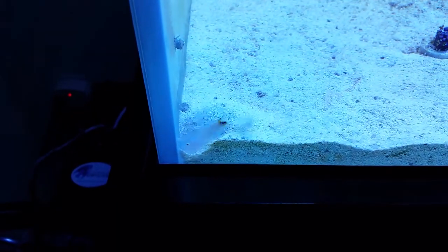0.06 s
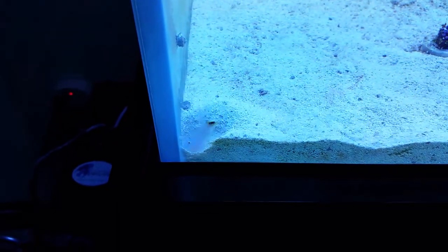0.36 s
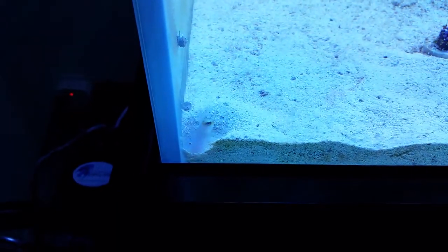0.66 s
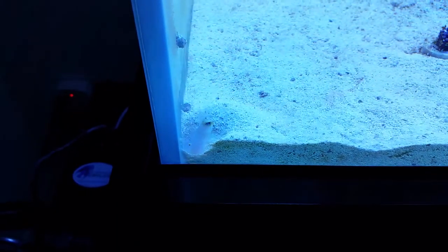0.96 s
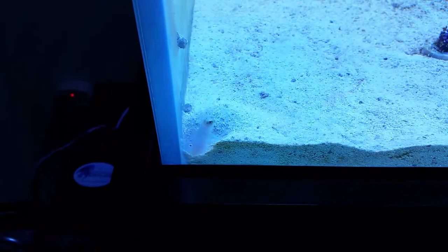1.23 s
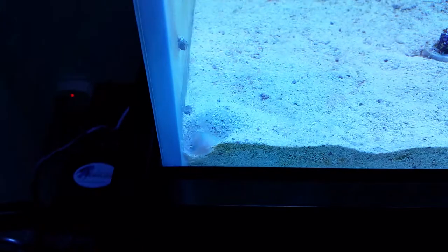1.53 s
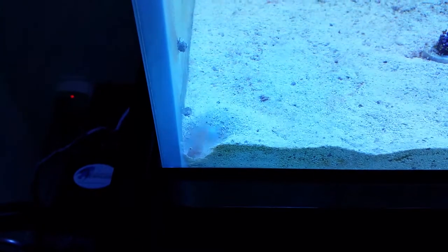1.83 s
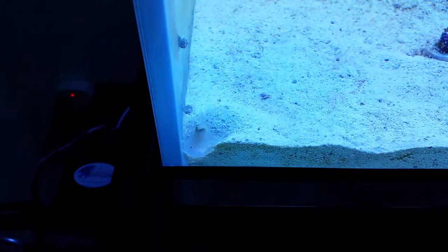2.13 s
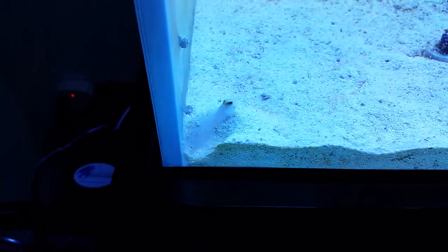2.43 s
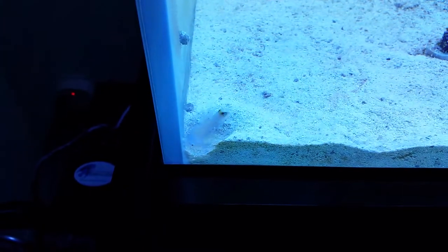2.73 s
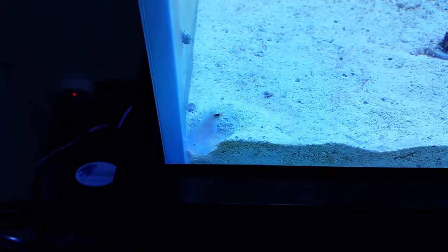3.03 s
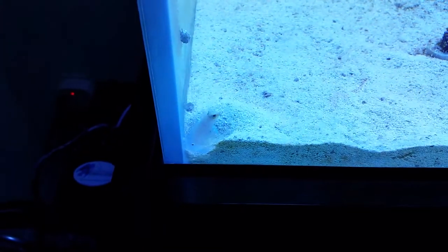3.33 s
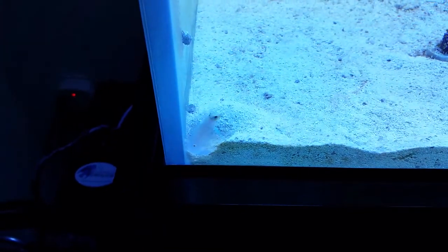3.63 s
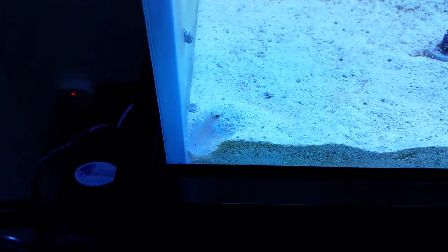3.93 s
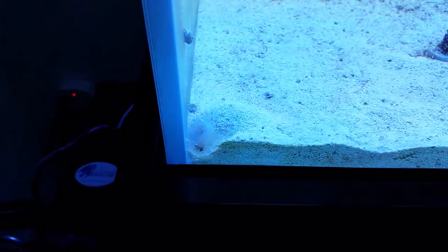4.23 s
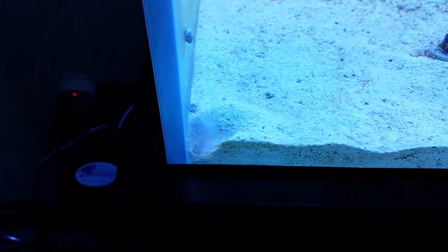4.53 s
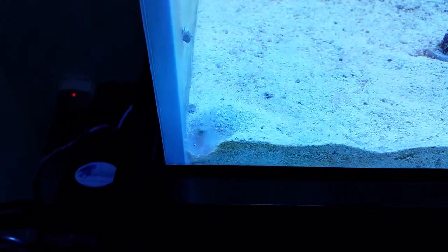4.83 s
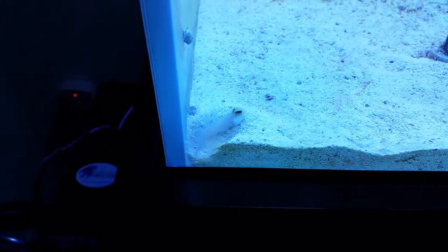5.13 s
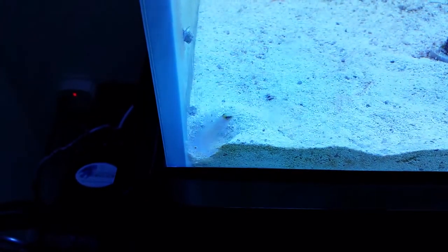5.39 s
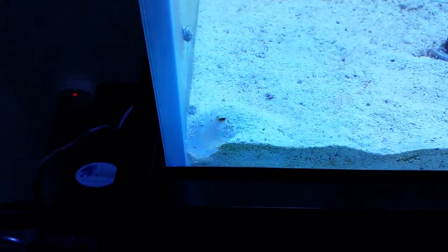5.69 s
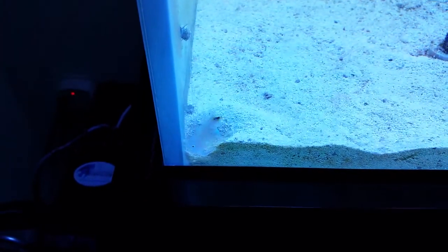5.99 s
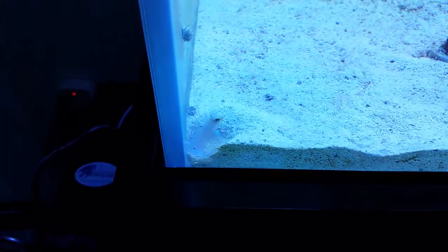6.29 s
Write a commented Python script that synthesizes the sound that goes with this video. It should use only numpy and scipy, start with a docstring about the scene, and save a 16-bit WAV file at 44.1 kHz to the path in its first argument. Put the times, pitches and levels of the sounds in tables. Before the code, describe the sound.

Water trickles and bubbles through a fish tank's circulation, with small splashes over the steady low hum of a pump.

```python
"""From the start, an aquarium pump hums through its stand in a quiet room and a second motor drones beside it.
All the while, turbulent water rushes down the drain, exciting its hollow resonances, and trickles into
a reservoir in the cabinet: drops splash on impact and trapped bubbles plink as they oscillate.
At 3.3 s something bumps softly, and the water runs on to the end."""
import sys
import numpy as np
from scipy import signal
from scipy.fft import rfft, irfft
from scipy.io import wavfile

SR = 44100
rng = np.random.default_rng(int(sys.argv[2]) if len(sys.argv) > 2 else 0)


def dump(signal):
    """Clip the signal to [-1, 1] and save it as 16-bit WAV at the path in sys.argv[1]."""
    limited = np.clip(np.atleast_2d(signal).T, -1, 1)
    pcm = np.round(limited * 32767).astype(np.int16)
    wavfile.write(sys.argv[1], SR, pcm)


N = 280035


def from_db(db):
    return 10 ** (np.asarray(db) / 20)


def unit_rms(x):
    return x / np.sqrt(np.mean(x ** 2) + 1e-20)


def at_hz(points, hz):
    """Interpolation on a logarithmic frequency axis."""
    frequencies, values = np.transpose(points)
    return np.interp(np.log(hz + 1e-9), np.log(frequencies), values)


def pan(balance_db):
    """Interchannel level difference: left and right gains."""
    return from_db(np.array([[1], [-1]]) * balance_db / 2)


def drift(corner_hz):
    """Slow random fluctuation: low-passed noise of unit rms."""
    hz = np.arange(N // 2 + 1) * SR / N
    return unit_rms(irfft(rfft(rng.standard_normal(N)) / (1 + (hz / corner_hz) ** 2), N))


def add(track, s, sound):
    """Superposition: a sound joins the track at time s."""
    start = max(int(s * SR), 0)
    part = sound[..., :max(N - start, 0)]
    track[..., start:start + part.shape[-1]] += part


def resonate(x, hz, width_hz, stages=1):
    """Two-pole resonators in series, each with unit peak gain."""
    r = np.exp(-np.pi * width_hz / SR)
    feedback = [1, -2 * r * np.cos(2 * np.pi * hz / SR), r * r]
    for _ in range(stages):
        x = signal.lfilter(np.array([1, 0, -1]) * (1 - r * r) / 2, feedback, x)
    return x


# Harmonics of the pump: (multiple of the mains frequency, rms level [dB], left minus right [dB])
PUMP_HARMONICS = [(1, -51.6, 1), (2, -44.6, 4), (3, -27.9, -0.6), (4, -52.3, 9), (5, -43.3, 2),
                  (6, -55.2, 2), (7, -52.4, 3), (8, -53.1, 7), (9, -54.2, 7), (10, -63.1, 9),
                  (12, -64.9, 9), (14, -62.2, 3), (15, -61.5, 4), (17, -66.2, 4)]
def pump(mains_hz=60.0, strong_waver_db=0.5, faint_waver_db=1.25, right_lag_s=0.00025):
    """Forced vibration at harmonics of the mains; the faint partials waver more than the strongest."""
    t = np.arange(N) / SR - np.array([[0], [right_lag_s]])
    strongest_db = max(db for _, db, _ in PUMP_HARMONICS)
    out = np.zeros((2, N))
    for order, db, balance_db in PUMP_HARMONICS:
        waver = (strong_waver_db if db == strongest_db else faint_waver_db) * drift(1.6)
        partial = np.sin(2 * np.pi * (mains_hz * order * t + rng.random()))
        out += from_db(db + waver) * pan(balance_db) * partial
    return np.sqrt(2) * out


def motor(mean_hz=145.5, wander_hz=0.51, level_db=-47.5):
    """Frequency modulation: the second motor's tone follows its slightly unsteady speed."""
    hz = mean_hz + wander_hz * drift(0.89)
    return from_db(level_db) * unit_rms(np.sin(2 * np.pi * np.cumsum(hz) / SR))


def bump(s=3.311, hz=82, db=-25, length_s=0.019):
    """A low tone burst of under two cycles is heard as a soft, dull knock."""
    out, t = np.zeros(N), np.arange(int(length_s * SR)) / SR
    add(out, s, from_db(db) * np.hanning(len(t)) * np.sin(2 * np.pi * hz * t))
    return out


# Direction of the water's sound: (frequency [Hz], left minus right [dB])
WATER_BALANCE = [(60, 10.5), (140, -6.5), (300, 0.5), (560, 3.5), (800, 2.5), (2000, 4.5), (3200, 6),
                 (4100, -1), (5400, -0.5), (7000, 4), (8300, 7), (10300, -4), (13000, -0.5)]
# Likeness of left and right: (frequency [Hz], coherence [0 to 1])
COHERENCE = [(40, 1), (200, 1), (650, 1), (850, 0.55), (1200, 0.12), (1600, 0.025)]
def placed(pair, spectrum=None, right_lag_s=0.000306):
    """Binaural cues: bass coherence, time and level differences, with an optional spectral shape."""
    hz = np.arange(N // 2 + 1) * SR / N
    left, right = rfft(pair[:, :N])
    blend = np.arcsin(np.clip(at_hz(COHERENCE, hz), -1, 1)) / 2
    both = np.cos(blend) * np.array([left, right]) + np.sin(blend) * np.array([right, left])
    both[1] *= np.exp(-2j * np.pi * hz * right_lag_s)
    colour = from_db(at_hz(spectrum, hz)) if spectrum else 1
    return irfft(both * colour * pan(at_hz(WATER_BALANCE, hz)), N)


# Hollow resonances of drain and stand: (frequency [Hz], nominal bandwidth [Hz], relative level [dB])
CAVITY_MODES = [(71, 13, -59), (97.9, 7.6, -60), (140.6, 16, -47), (202.4, 53, -43), (274, 19, -53.5),
                (328.4, 11, -47), (379, 61, -41.5), (465.4, 36, -53.5), (560, 78, -52), (677.6, 24, -55.5),
                (763, 13.4, -55)]
# Rush of the drain: (frequency [Hz], relative spectral density [dB])
RUSH_SPECTRUM = [(15, 0), (35, -3.5), (120, 4.5), (260, 0), (480, -3), (640, 1.5), (860, -3.5), (1060, -15),
                 (1500, -12.5), (4000, -30.5)]
def drain(rush_db=-41, churn_db=1.3, cavity_gain_db=-1.5):
    """Turbulence in the pipe radiates broadband noise and excites the cavity resonances around it."""
    turbulence = rng.standard_normal((2, N)) * from_db(churn_db * drift(3.0))
    cavities = np.zeros((2, N))
    for hz, width_hz, db in CAVITY_MODES:
        ringing = resonate(rng.standard_normal((2, N)), hz, 1.15 * width_hz, stages=2)
        cavities += from_db(db) * unit_rms(ringing)
    rush = unit_rms(placed(turbulence, RUSH_SPECTRUM))
    return from_db(rush_db) * rush + from_db(cavity_gain_db) * placed(cavities)


def cabinet(x, direct_db, early_db, early_s, t60_s=0.33):
    """Reverberation: direct sound and early reflections off glass and wood, in dB above a diffuse tail."""
    t = np.arange(SR // 5) / SR
    direct = unit_rms(1. * (t == 0))
    early = unit_rms(rng.standard_normal((2, len(t))) * np.exp(-t / early_s))
    tail = unit_rms(rng.standard_normal((2, len(t))) * from_db(-60 * t / t60_s))
    response = from_db(direct_db) * direct + from_db(early_db) * early + tail
    return signal.fftconvolve(x[None], unit_rms(response) / np.sqrt(len(t)), axes=1)[:, :N]


def bubble(hz, cycles, rise):
    """Damped oscillation of trapped air, whose pitch climbs as it nears the surface."""
    age = np.arange(int(5 * cycles * SR / hz)) * hz / (SR * cycles)   # in decay time constants
    return np.exp(-age) * np.sin(2 * np.pi * cycles * (age + rise * age ** 2 / 2))


def small_bubbles(per_s=110, spread_db=2.0, cycles=9, rise=0.0422, low_hz=850, high_hz=9000):
    """Incoherent sum of small bubbles of random pitch, strength and damping."""
    out = np.zeros(N)
    for when, pitch, strength, sustain in rng.random((int(per_s * N / SR), 4)):
        hz = low_hz * (high_hz / low_hz) ** pitch
        db = spread_db * min(-np.log(strength + 1e-9), 3.2)
        add(out, when * N / SR, from_db(db) * hz * bubble(hz, cycles * (.5 + sustain), rise))
    return unit_rms(out)


def spray(clumps, per_s=110, spread_db=2.0, clump_db=3.5, edge_hz=4200):
    """Shot noise: fine droplets tick on the surface at a rate that comes in clumps."""
    lands = rng.random(N) < per_s * from_db(clump_db * clumps) / SR
    ticks = lands * rng.choice([-1, 1], N) * from_db(spread_db * np.minimum(rng.exponential(1, N), 4))
    return unit_rms(signal.sosfilt(signal.butter(2, edge_hz, "high", fs=SR, output="sos"), ticks))


# Strength of the flow: (time [s], bubbling level [dB], spray level [dB])
FLOW_LEVELS = [(0.0, -41.5, -49.5), (0.3, -44.5, -47.5), (1.2, -46, -54.5), (1.7, -42.5, -46.5),
               (2.0, -44.5, -50.5), (2.4, -43.4, -49), (2.9, -45.5, -51.5), (3.2, -43, -50.7),
               (3.3, -46.5, -53.0), (3.8, -43.5, -46), (4.5, -47, -53.5), (4.6, -43.5, -47),
               (5.1, -44.5, -53.8), (5.5, -43.0, -46.5), (5.7, -44.5, -52.1), (6.0, -41, -45),
               (6.1, -46, -49), (6.35, -40.5, -49)]
def flow_swings():
    """Level envelopes of bubbling and spray, in dB about their means."""
    times, *columns = np.transpose(FLOW_LEVELS)
    envelopes = [np.interp(np.arange(N) / SR, times, db) for db in columns]
    return [db - db.mean() for db in envelopes]


# Colour of the tiny bubbles and spray: (frequency [Hz], relative gain [dB])
TRICKLE_COLOUR = [(500, -30), (1100, -5.5), (1450, -0.5), (2300, -1), (3100, -7.5), (4100, -10),
                  (5100, -18.5), (6900, -12.5), (8400, -19.5), (10400, -8.5), (12000, -12), (13500, -22),
                  (15000, -54)]
def trickle(level_db=-48.0, bubbles_db=-1, spray_db=1.0, hiss_db=-5.5, sputter_db=1.0, spots=6):
    """Amplitude modulation: bubbles and spray swell with the sputtering flow, over a steady hiss."""
    bubble_swing_db, spray_swing_db = flow_swings()
    sputter = sputter_db * drift(10)
    bubble_gain = from_db(bubbles_db + 1.2 * bubble_swing_db + sputter)
    spray_gain = from_db(spray_db + 0.89 * spray_swing_db + sputter)
    clumps, water = drift(11), 0
    for _ in range(spots):
        grains = bubble_gain * small_bubbles() + spray_gain * spray(clumps)
        water = water + cabinet(grains, direct_db=-15, early_db=0.5, early_s=0.013)
    water = water / np.sqrt(spots) + from_db(hiss_db) * rng.standard_normal((2, N))
    return from_db(level_db) * unit_rms(placed(water, TRICKLE_COLOUR))


def stray_bubbles(per_s=6, base_db=-55, low_hz=1500, high_hz=3600):
    """Random middling bubbles whose level follows the flow: (time [s], pitch [Hz], level [dB])."""
    swing_db = flow_swings()[0]
    return [(when * N / SR, low_hz * (high_hz / low_hz) ** pitch, base_db + swing_db[int(when * N)])
            for when, pitch in rng.random((int(per_s * N / SR), 2))]


# The largest bubbles: (time [s], pitch [Hz], relative level [dB])
LARGE_BUBBLES = [(0.17, 2840, -52), (0.546, 3270, -49), (0.782, 1650, -44), (0.895, 1480, -47.5),
                 (1.347, 2930, -53.5), (1.619, 1610, -47), (1.849, 1590, -51), (2.112, 2720, -49),
                 (2.492, 2600, -50.5), (2.602, 2620, -51), (3.196, 2160, -47.5), (3.259, 3200, -51),
                 (3.658, 1870, -49), (3.658, 777, -40.5), (3.729, 1790, -41), (3.753, 550, -38),
                 (4.144, 1220, -47), (4.2, 2850, -52), (4.243, 2740, -52.5), (4.499, 2346, -47.5),
                 (4.73, 2170, -54), (4.78, 1740, -48), (4.917, 3290, -46), (5.249, 1304, -44.5),
                 (5.474, 700, -40), (5.536, 2000, -43), (5.823, 2110, -45), (6.014, 1490, -49.5),
                 (6.019, 2780, -52)]
def plinks(gain_db=15.5, cycles=12, rise=0.032, swell_cycles=1.1,
           shed_db=-11, shed_within_s=0.04, shed_octaves=0.297):
    """Bubble resonance: large bubbles ring and each sheds two smaller, higher ones; strays fall between."""
    out = np.zeros((2, N))
    shed = [(s + shed_within_s * late, hz * 2 ** (shed_octaves * higher), db + shed_db)
            for s, hz, db in LARGE_BUBBLES for late, higher in rng.random((2, 2))]
    for s, hz, db in LARGE_BUBBLES + shed + stray_bubbles():
        ping = from_db(db + gain_db) * np.sqrt(hz / 2000) * bubble(hz, cycles, rise)
        swell = 1 - np.exp(-np.arange(len(ping)) * hz / (SR * swell_cycles))
        add(out, s, cabinet(ping * swell, direct_db=-8, early_db=2.5, early_s=.011))
    return placed(out)


# Falling lumps of water: (time [s], relative level [dB], centre frequency [Hz])
WATER_LUMPS = [(0.421, -44, 3800), (1.66, -44, 1880), (2.423, -36.5, 670), (3.72, -49, 2300),
               (3.963, -60, 600), (4.35, -40, 750), (4.921, -45.5, 2500), (5.425, -41, 1200),
               (5.966, -43.5, 2490)]
def plops(gain_db=7, fade_s=0.0061):
    """Impact noise: a lump of water slaps the surface with a broad, dull, heavily damped burst."""
    out, t = np.zeros((2, N)), np.arange(SR // 20) / SR
    for s, db, hz in WATER_LUMPS:
        slap = unit_rms(resonate(rng.standard_normal(len(t)), hz, width_hz=hz)) * np.exp(-t / fade_s)
        add(out, s, from_db(db + gain_db) * cabinet(slap, direct_db=0, early_db=3, early_s=.007))
    return placed(out)


# The heaviest drops: (time [s], relative level [dB], fizz frequency [Hz])
HEAVY_DROPS = [(0.0372, -30.5, 3900), (0.2404, -27.5, 9700), (0.4217, -32, 6500), (0.4377, -30, 6660),
               (1.305, -36, 7240), (1.516, -38.5, 6760), (1.66, -34, 8700), (1.722, -36, 6160),
               (1.9174, -38, 7530), (2.426, -36, 9800), (2.8417, -37, 6640), (3.059, -38, 5630),
               (3.2091, -40, 7140), (3.559, -37, 10500), (3.724, -34, 3930), (4.352, -36, 9700),
               (4.51, -35, 3900), (4.549, -27, 4740), (4.8126, -33.5, 9900), (5.429, -34.5, 10200),
               (5.6326, -35, 4150), (5.797, -33.5, 7100), (5.901, -29.5, 11300), (6.0046, -33, 11100)]
def splashes(gain_db=6, attack_s=0.0015, fade_s=0.003, fallback_db=-15, fallback_s=0.023,
             fizz_width_hz=2400, snap_db=-8, snap_band_hz=(1500, 12000)):
    """A brief impact has a broad spectrum: a drop snaps and fizzes, then its droplets fall back."""
    out, t = np.zeros((2, N)), np.arange(SR // 10) / SR
    snap_band = signal.butter(1, snap_band_hz, "band", fs=SR, output="sos")
    for s, db, hz in HEAVY_DROPS:
        droplets = unit_rms(rng.standard_normal(len(t)) ** 3) * np.exp(-t / fallback_s)   # spiky noise
        impact = rng.standard_normal(len(t)) * np.exp(-t / fade_s)
        burst = (impact + from_db(fallback_db) * droplets) * np.minimum(t / attack_s, 1)
        fizz = resonate(burst, hz, fizz_width_hz, stages=2)
        snap = from_db(snap_db) * signal.sosfilt(snap_band, burst)
        drop = from_db(db + gain_db) * (fizz + snap)
        add(out, s, cabinet(drop, direct_db=-7, early_db=2, early_s=.011))
    return placed(out)


def scene():
    """Superposition of the motors, the drain, the falling water and the bump."""
    return pump() + motor() + drain() + trickle() + plinks() + plops() + splashes() + bump()


def record(dry, cutoff_hz=14550):
    """Band limiting: a steep low-pass filter removes the highest treble."""
    return signal.sosfilt(signal.ellip(12, .1, 80, cutoff_hz, fs=SR, output="sos"), dry)


dry = scene()
out = record(dry)
dump(out)
```